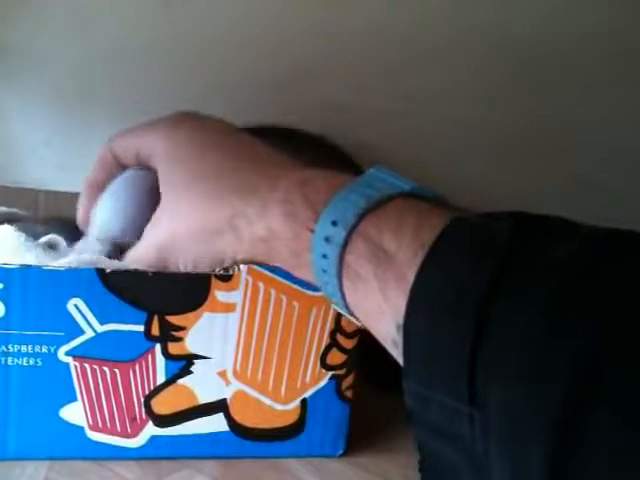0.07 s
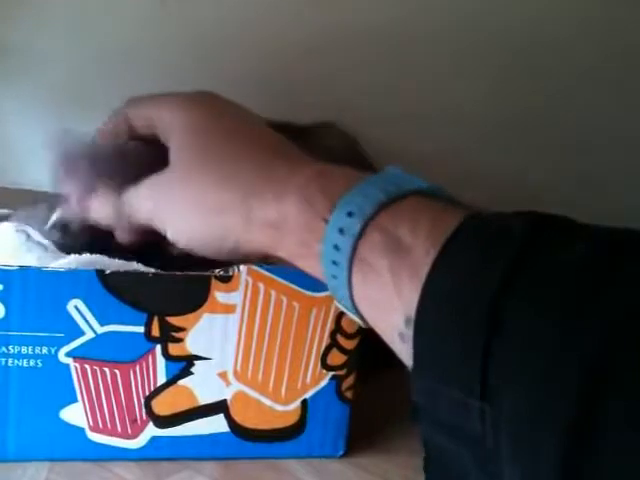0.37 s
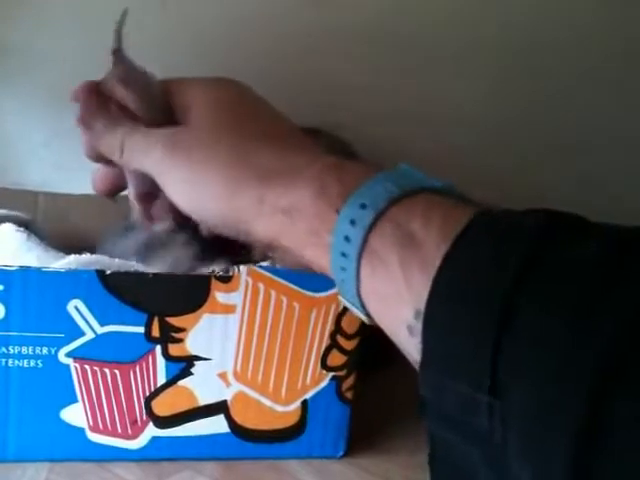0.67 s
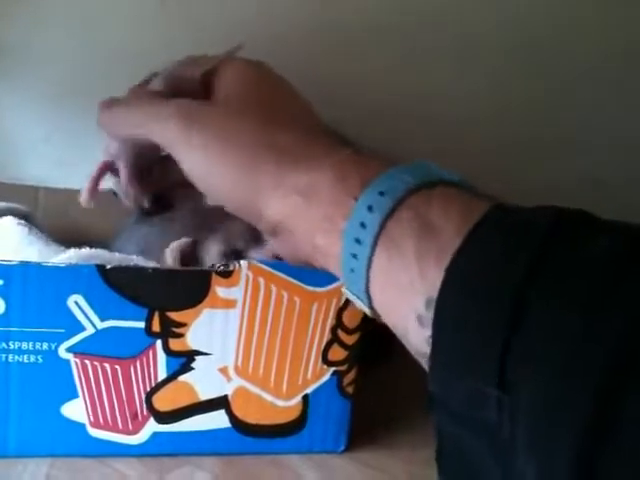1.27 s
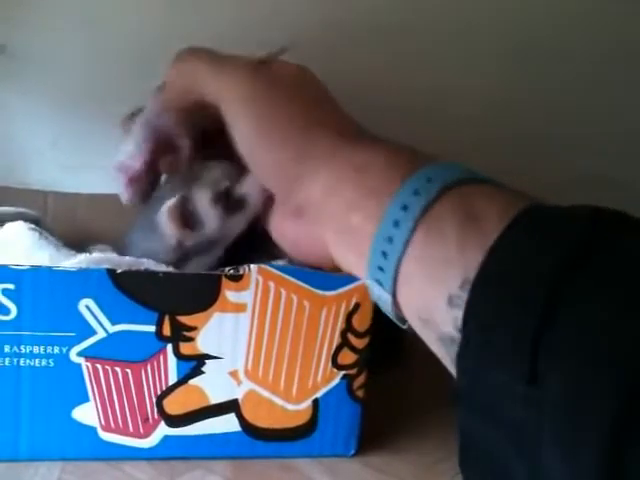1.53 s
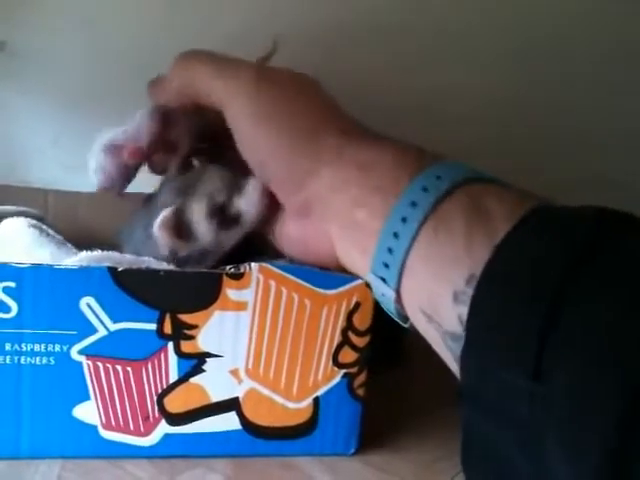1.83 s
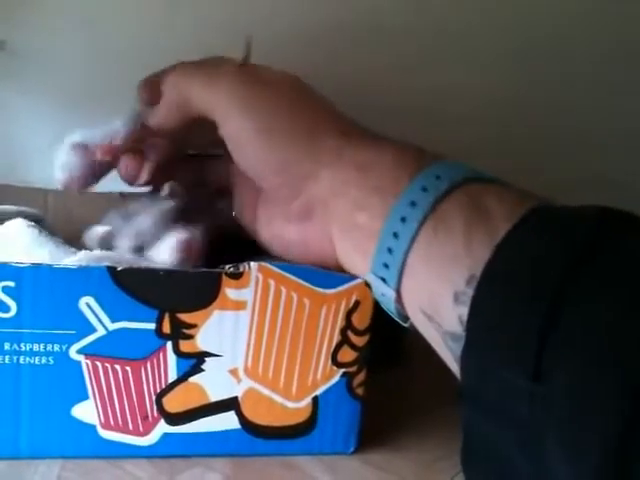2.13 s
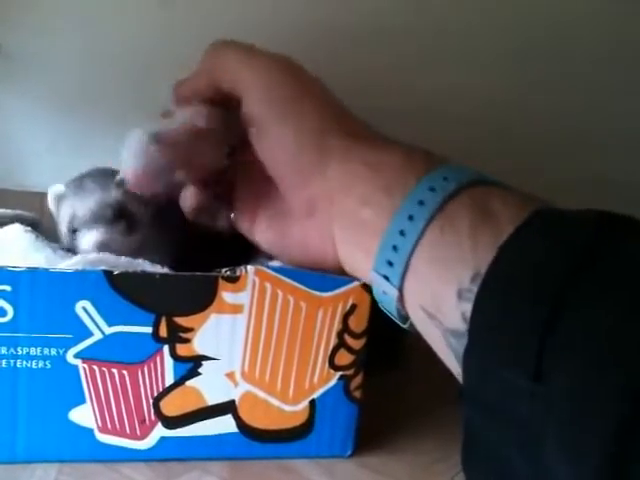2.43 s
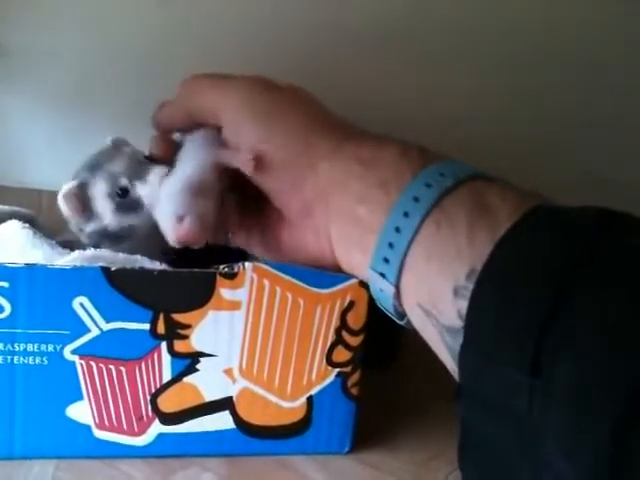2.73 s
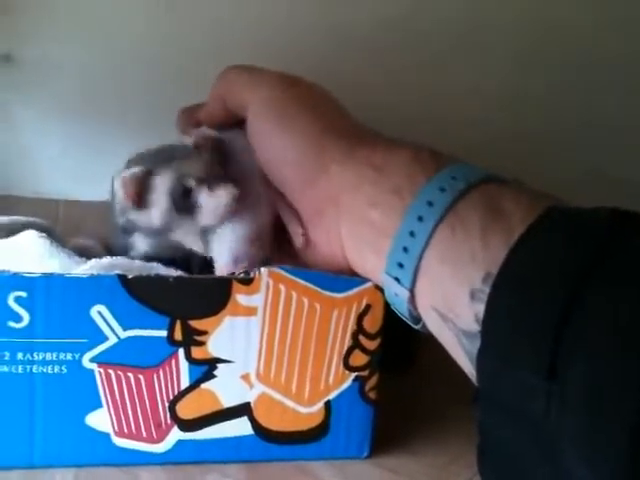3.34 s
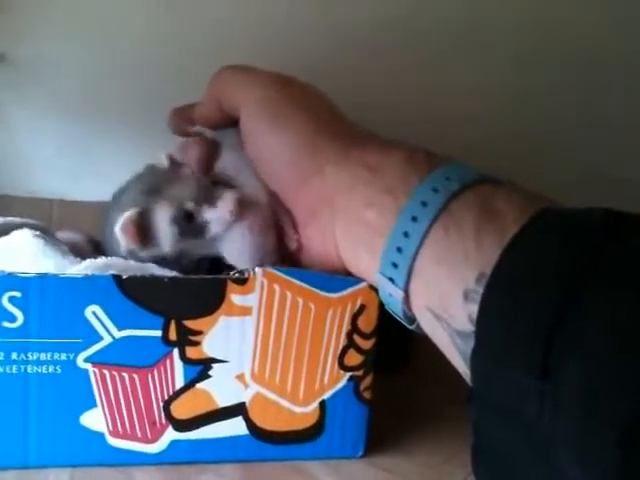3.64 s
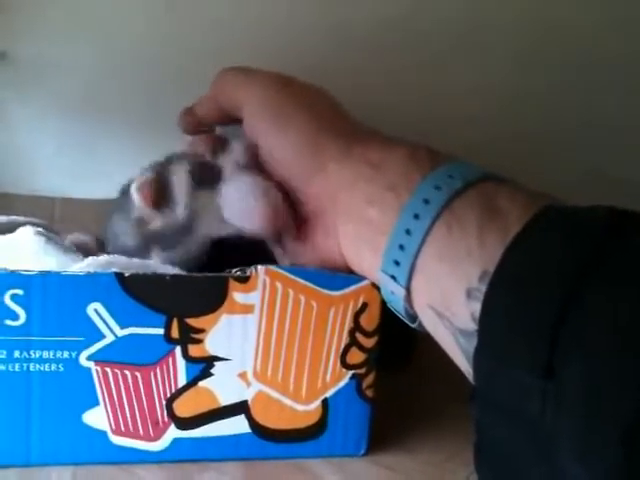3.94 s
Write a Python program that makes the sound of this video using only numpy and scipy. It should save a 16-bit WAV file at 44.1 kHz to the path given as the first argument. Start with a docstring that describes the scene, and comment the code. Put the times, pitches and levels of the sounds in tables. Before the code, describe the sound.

A baby ferret squeals shrilly again and again while its litter mates whimper faintly.

```python
"""A baby ferret, held in a hand, squeals in shrill arching cries that turn hoarse as the pitch sags.
Each cry is a stack of harmonics (multiples of one pitch) shaped by the throat and the moving mouth.
Its litter mates whimper behind it in a cardboard box and the mother clucks softly, while the hand
bumps the box and rustles the bedding. All of it is close to one microphone in a small room."""
import sys
import numpy as np
from scipy import signal
from scipy.fft import rfft, irfft
from scipy.io import wavfile
from scipy.ndimage import uniform_filter1d

SR = 44100
rng = np.random.default_rng(int(sys.argv[2]) if len(sys.argv) > 2 else 0)


def wav_record(signal):
    """Record a signal, one row per channel, as 16-bit PCM in the file named by sys.argv[1]."""
    frames = np.transpose(np.atleast_2d(signal))
    bounded = np.clip(frames, -1, 1)
    # unit amplitude maps onto the largest positive 16-bit level
    quanta = np.round(bounded * 32767).astype(np.int16)
    wavfile.write(sys.argv[1], SR, quanta)


N = 176400
TIME = np.arange(N) / SR

# Tone colours of the room's hush, the bedding, brushes on cloth and box knocks: frequency_hz, gain_db
HUSH_COLOUR = [(25, -16), (70, -13), (115, -16), (170, -9), (300, -0.5), (600, 0), (1000, -11), (2000, -9),
               (4000, -4), (7000, -15), (11000, -17.5), (15500, -37)]
BEDDING_COLOUR = [(60, -16), (120, 10), (300, 4), (900, 10), (2000, 13), (6000, -28), (14000, -70)]
BRUSH_COLOUR = [(300, -10), (1200, -4.5), (3000, 0), (6000, -4), (10000, -12), (15000, -19)]
BUMP_COLOUR = [(50, -24), (110, 7.5), (200, 9), (400, 1.5), (700, 3.5), (1500, -26), (6000, -40)]
# Echoes off the box and the wall: delay_s, gain_db
ECHOES = [(.0023, -19.5), (.0052, -21.5), (.0087, -9)]
# Fur and hand brushing the cloth: middle_s, half_length_s, level_db
BRUSHES = [(0.113, 0.1, -57.5), (0.324, 0.097, -52.5), (.98, 0.062, -50), (1.509, 0.045, -53.5),
           (1.774, 0.079, -56), (3.303, 0.043, -48)]
# Bumps on the box: start_s, level_db
BUMPS = [(2.355, -45.5), (2.59, -54), (3.18, -43.5)]
# The mother's clucks: start_s, relative_level_db
CLUCKS = [(0.022, -41), (0.984, -43.5), (1.101, -51.5), (1.21, -63), (1.294, -49), (1.43, -41.5),
          (1.56, -45), (1.668, -47), (1.774, -48), (2.99, -49), (3.439, -49), (3.58, -45.5), (3.678, -50.5),
          (3.812, -51.5), (3.913, -50)]
# Tone colours of the mother's cluck and of a baby's throat: frequency_hz, gain_db
CLUCK_COLOUR = [(100, -31), (170, 12), (240, -2), (330, 12.5), (480, 1), (700, -3.5), (1100, -19),
                (2500, -24)]
THROAT_COLOUR = [(700.0, -5.5), (1100.0, -2), (1600.0, -10), (2300.0, -3.5), (3200.0, -2.5), (4000.0, -3.5),
                 (4800.0, -6), (6000.0, -3.5), (7800.0, -6), (9800.0, -7), (12000.0, -14), (15500.0, -26)]
# Times when babies call from deep in the box: start_s, stop_s
LITTER_SPANS = [(0, 0.18), (0.302, 0.6), (.92, 1.62), (1.7, 3.87)]
# Whimpers of the nearer litter mates, one curve each: time_s, pitch_hz, relative_level_db, treble_db
WHIMPERS = [
    [(0.38, 936, -56, -25), (0.48, 947, -54.5, -25), (0.58, 883, -66, -25)],
    [(0.735, 917, -51, -23), (0.771, 1055, -52, -13), (0.88, 940, -51, -30)],
    [(2.6, 1006, -53, -12), (2.646, 1070, -51, -19), (2.76, 901, -57, -25)],
    [(3.05, 962, -53, -25), (3.328, 1112, -58.5, -20), (3.45, 970, -57, -25)],
    [(1.3, 1594, -54, -25), (1.444, 2024, -51, -25), (1.64, 1487, -53, -23)],
    [(2.85, 2020, -49, -25), (2.922, 1888, -44, -17), (3.01, 1990, -47, -25)],
    [(0.69, 2589, -44, -3), (0.728, 2110, -69, 16.5), (0.91, 2517, -57.5, -4.5)],
    [(0.0, 1032, -53, -11), (0.058, 965, -51.5, -10), (0.11, 757, -59, -18)],
    [(2.43, 953, -53.5, -15), (2.554, 1214, -51.5, -14), (2.6, 1123, -52, -11)],
]
# Cries of the held baby, one curve each: time_s, pitch_hz, relative_level_db, treble_db
CRY_1 = [(0.0, 1990, -43, -4), (0.03, 2090, -47, -2.5), (0.07, 2180, -42, -9.5), (0.1, 1950, -47, -24),
         (0.125, 1470, -49, -23), (0.175, 1590, -51, -24), (0.2, 1514, -52, -2), (0.22, 1710, -56, -7)]
CRY_2 = [(0.353, 1535, -46.5, 8), (0.37, 1656, -48.5, 8), (0.4, 1635, -45.5, 12),
         (0.435, 1636, -49.5, 11.5), (0.47, 1820, -47, 14), (0.5, 1877, -40.5, 3), (0.54, 1930, -43, 7),
         (0.58, 1793, -41, 2.5), (0.61, 1821, -36, -4.5), (0.67, 1704, -41.5, -5.5),
         (0.69, 1480, -42.5, -9), (0.71, 1169, -40, -29), (0.735, 980, -44, -14)]
CRY_3 = [(1.02, 1047, -44, -13), (1.05, 1182, -55.5, -2.5), (1.09, 1467, -38.5, -10),
         (1.13, 1702, -54.5, 12.5), (1.165, 1660, -50.5, 14.5), (1.205, 1679, -46.5, 10.5),
         (1.24, 1546, -38.5, 2.5), (1.26, 1629, -42, 6), (1.31, 1537, -37, -7), (1.375, 1566, -41.5, -5),
         (1.42, 1747, -41.5, -1), (1.45, 1420, -40, -4.5), (1.48, 1156, -42.5, -29),
         (1.525, 916, -50.5, -3)]
CRY_4 = [(1.775, 1159, -48, -13), (1.8, 1222, -55.5, 1.5), (1.85, 1215, -52.5, 4.5), (1.89, 1391, -50, 7.5),
         (1.92, 1302, -50.5, 3.5), (1.945, 1247, -50.5, 8), (1.97, 1570, -48, 8), (2.01, 1654, -42.5, 2.5),
         (2.04, 1526, -44, -3), (2.07, 1472, -45.5, 2), (2.1, 1698, -41, 2), (2.125, 1787, -33, -4.5),
         (2.16, 1628, -50, 7.5), (2.19, 1574, -45, -2), (2.22, 1231, -47.5, 3.5), (2.255, 1008, -53.5, 1.5),
         (2.28, 887, -43, -24)]
CRY_5 = [(2.29, 893.0, -51, -18), (2.34, 1082.0, -48, -19), (2.38, 1255.0, -47, -14),
         (2.4, 1477.0, -46.5, -10), (2.45, 1520.0, -41.5, -18.5), (2.48, 1152.0, -42.5, -24),
         (2.52, 912.0, -42, -21)]
CRY_6 = [(2.61, 1293, -57.5, 6.5), (2.65, 1377, -40.5, -7.5), (2.68, 1500, -53.5, 14),
         (2.72, 1558, -46, 2.5), (2.75, 1654, -40.5, 0), (2.787, 1953, -47, 19), (2.825, 1863, -43.5, 16.5),
         (2.85, 1934, -49, 20.5), (2.88, 2103, -41, 13), (2.915, 1977, -54.5, 25),
         (2.985, 2043, -43.5, 15.5), (3.02, 1965, -40, 8.5), (3.05, 2000, -44.5, 11),
         (3.08, 1921, -37.5, 4.5), (3.16, 1903, -41.5, 5), (3.19, 1818, -38, -1), (3.22, 1481, -40.5, -4.5),
         (3.27, 1155, -47, -3), (3.3, 989, -48, -7)]
CRY_7 = [(3.33, 1070, -55.5, -20), (3.38, 1337, -57.5, 7), (3.41, 1753, -54, 3), (3.445, 1740.0, -54, 1.5),
         (3.47, 1514, -50, 0), (3.505, 1653.0, -55, 1), (3.53, 1523, -40.5, -12), (3.56, 1249, -45, -8.5),
         (3.59, 1036.0, -49, -18), (3.68, 1065, -47.5, -24.5), (3.8, 878, -49.5, -12.5)]
CRY_8 = [(3.65, 1046, -54, -8), (3.7, 1608, -42, -19), (3.74, 1590, -37, -34), (3.78, 1674, -38, -40),
         (3.81, 1634, -36, -24.5), (3.84, 1800, -51, 7.5), (3.875, 2040, -37.5, 0.5),
         (3.925, 1935, -52.5, 18.5), (3.965, 1994, -40, 13), (4.0, 1842, -45.5, 20.5)]
# The voice in each cry: curve, hoarseness (0 to 1), highest_treble_db
CRIES = [(CRY_1, 0.077, 0), (CRY_2, 0.093, 1.7), (CRY_3, 0.077, -10.5), (CRY_4, 0.14, 0),
         (CRY_5, 0.033, -4), (CRY_6, 0.11, 0.62), (CRY_7, 0.23, 2.6), (CRY_8, 0.069, -7.5)]
# Where the held baby's mouth rings as it opens and closes: time_s, frequency_hz
MOUTH_RING = [(0.02, 8160), (0.08, 6000), (0.2, 3550), (0.35, 8000), (0.41, 7400), (0.46, 5840),
              (0.5, 5330), (0.55, 4000), (0.6, 5510), (0.66, 5300), (0.72, 5100), (1.05, 7000),
              (1.12, 8800), (1.19, 8670), (1.24, 6700), (1.3, 6370), (1.37, 3860), (1.45, 4000),
              (1.8, 8700), (1.9, 8500), (2.0, 5840), (2.06, 5900), (2.12, 9450), (2.17, 7120), (2.26, 6280),
              (2.65, 6850), (2.72, 5840), (2.76, 7400), (2.8, 8600), (2.84, 8650), (2.89, 6560),
              (3.0, 5650), (3.1, 5720), (3.26, 5240), (3.42, 3680), (3.55, 3600), (3.82, 6700),
              (3.88, 9200), (3.94, 8600), (4.0, 7900)]
# Boost or cut around that ringing frequency: frequency_multiple, gain_db
MOUTH_SHAPE = [(.5, -1.5), (.72, 0), (1, 4.5), (1.32, -2.5), (1.7, 0.5), (2.2, -4)]
# Moments when the voice cracks: time_s, added_hoarseness (0 to 1)
CRACKS = [(.45, .25), (2.769, 0.41), (2.862, 0.22), (3.2, 0)]

TREBLE_HZ, HIGHEST_TREBLE_HZ = (2550, 6880), (9150, 11400)  # where each band begins and is fully on
TOP_HZ = 15700
CLEAN_HZ, SLACK_HZ, SLACK_HOARSENESS = 1800, 1220, 0.27  # slack vocal folds make low notes hoarse
JITTER, SHIMMER_DB = 0.027, 5  # shake of pitch and loudness at full hoarseness
RASP_DB, SPLIT_DB = 1.5, -7.5  # noise and in-between tones in the treble at full hoarseness
WAVER, FLUTTER_DB = 0.0025, 3  # wobble of the pitch and of each harmonic, even in a clean voice


def undb(db):
    """Turn decibels into a number to multiply by."""
    return 10 ** (np.asarray(db) / 20)


def unit(x):
    """Scale a sound to an average strength (rms) of 1."""
    return x / np.sqrt(np.mean(x ** 2) + 1e-20)


def response(hz, points):
    """Read the gain of a tone colour table at these frequencies."""
    table_hz, db = np.array(points, float).T
    return undb(np.interp(np.log(hz + 1), np.log(table_hz), db))


def colour(x, points):
    """Filter a sound with a tone colour table."""
    return irfft(rfft(x) * response(np.fft.rfftfreq(len(x), 1 / SR), points), len(x))


def noise(points):
    """Noise with this tone colour, as long as the scene."""
    return colour(rng.standard_normal(N), points)


def wander(t, rate_hz):
    """Random drift of size about 1, with a new value rate_hz times a second."""
    values = rng.standard_normal(size=8192)
    return np.sqrt(3 / 2) * np.interp((t - t[0]) * rate_hz, np.arange(len(values)), values)


def ramp(hz, low_hz, high_hz):
    """Rise from 0 at the low frequency to 1 at the high one."""
    return np.clip(np.log(hz / low_hz) / np.log(high_hz / low_hz), 0, 1)


def fade(t, length_s):
    """A soft start and stop."""
    return np.sin(np.pi / 2 * np.clip(np.minimum(t - t[0], t[-1] - t) / length_s, 0, 1)) ** 2


def add(out, t, x):
    """Mix the sound x into out at the times t."""
    i = np.round(t * SR).astype(int)
    inside = (i >= 0) & (i < N)
    out[i[inside]] += x[inside]


def room_hush():
    """The faint, steady noise of the room."""
    return undb(-60) * unit(noise(HUSH_COLOUR))


def room_echoes(x, tail_s=0.12, tail_db=-18):
    """Sound bounces off the box and the wall, then dies away in a short tail."""
    t = TIME[:SR // 2]
    tail = rng.standard_normal(len(t)) * undb(-60 * t / tail_s) * np.clip(t / 0.012, 0, 1)
    bounces = undb(tail_db) * tail / np.sqrt(np.sum(tail ** 2))
    bounces[0] = 1  # the direct sound
    for delay_s, db in ECHOES:
        bounces[int(delay_s * SR)] += undb(db)
    return signal.fftconvolve(x, bounces)[:N]


def box_bumps(attack_s=0.004, decay_s=0.025):
    """The hand knocks the cardboard: dull bursts of noise that die quickly."""
    loudness = np.zeros(N)
    for start_s, db in BUMPS:
        age = np.maximum(TIME - start_s, 0)
        loudness += undb(db) * np.minimum(age / attack_s, 1) * np.exp(-age / decay_s)
    return loudness * unit(noise(BUMP_COLOUR))


def bedding(rustle_db=-59.5, swell_db=3, grain_db=3):
    """The cloth rustles in soft swells, with brighter strokes where fur and hand brush it."""
    rustle = unit(noise(BEDDING_COLOUR) * undb(swell_db * wander(TIME, 18)))
    brush = unit(noise(BRUSH_COLOUR) * undb(grain_db * wander(TIME, 360)))
    strokes = sum(undb(db) * np.exp(-((TIME - at) / half_s) ** 2) for at, half_s, db in BRUSHES)
    return undb(rustle_db) * rustle + strokes * brush


def mother_clucks(pitch_hz=263, length_s=0.044, gain_db=-3.5):
    """The mother's voice makes short, low clucks, uneven in pitch and loudness."""
    out = np.zeros(N)
    t = np.arange(int(length_s * SR)) / SR
    for start_s, db in CLUCKS:
        shaky_hz = pitch_hz * (1 + 0.064 * wander(t, 106))
        phase = 2 * np.pi * np.cumsum(shaky_hz) / SR
        buzz = sum(np.cos(k * phase) for k in np.arange(1, 9))
        cluck = unit(colour(buzz * undb(2 * wander(t, 335)), CLUCK_COLOUR))
        add(out, start_s - 0.005 + t, cluck * fade(t, 0.0058) * undb(db + gain_db))
    return out


def mouth_db(t, hz):
    """How much the opening and closing mouth boosts or cuts a harmonic."""
    ring_hz = np.interp(t, *np.array(MOUTH_RING, float).T)
    return np.interp(hz / ring_hz, *np.array(MOUTH_SHAPE, float).T)


def extra_hoarseness(t, pitch_hz, crack_s=0.011):
    """The voice roughens when the vocal folds go slack at low pitch, and briefly when it cracks."""
    slack = SLACK_HOARSENESS * np.clip((CLEAN_HZ - pitch_hz) / (CLEAN_HZ - SLACK_HZ), 0, 1)
    cracks = sum(size * np.exp(-((t - at) / crack_s) ** 2) for at, size in CRACKS)
    return slack + cracks


def squeal(curve, hoarseness, highest_db=0, octave_db=0, held=False, harmonics=11, fade_s=0.013):
    """One baby's call, as times and sound: shaky vocal folds make harmonics that the throat shapes."""
    times, *columns = np.array(curve, float).T
    t = np.arange(int((times[0] - fade_s / 2) * SR), int((times[-1] + fade_s / 2) * SR)) / SR
    pitch_hz, level_db, treble_db = (
        uniform_filter1d(np.interp(t, times, column), size=500, mode="nearest") for column in columns)
    rough = np.clip(hoarseness + held * extra_hoarseness(t, pitch_hz), 0, 1)
    shaky_hz = pitch_hz * (1 + JITTER * rough * wander(t, 700) + WAVER * wander(t, 120))
    phase = 2 * np.pi * np.cumsum(shaky_hz) / SR
    voice = np.zeros(len(t))
    for k in range(1, harmonics + 1):
        hz = k * pitch_hz
        treble = ramp(hz, *TREBLE_HZ)
        shape_db = treble_db * treble + highest_db * ramp(hz, *HIGHEST_TREBLE_HZ)
        shape_db += octave_db * np.log2(k) + held * mouth_db(t, hz)
        flutter_db = FLUTTER_DB * wander(t, 110)
        gain = response(hz, THROAT_COLOUR) * undb(shape_db + flutter_db) * (hz < TOP_HZ)
        angle = k * phase + 2 * np.pi * rng.random()
        # The rasp is a narrow band of noise that clings to the harmonic.
        rasp = wander(t, 450) * np.sin(angle) + wander(t, 450) * np.cos(angle)
        voice += gain * (np.sin(angle) + undb(RASP_DB) * rough * treble * rasp)
        # Weak tones sit halfway between the low harmonics; hoarseness adds them in the treble too.
        between_hz = (k - 0.5) * pitch_hz
        low_gain = undb(-22) * response(between_hz, THROAT_COLOUR) / (1 + (between_hz / 2190) ** 4)
        split_gain = undb(SPLIT_DB) * rough * treble * gain
        voice += (low_gain + split_gain) * np.sin(angle - phase / 2)
    loudness = undb(level_db + SHIMMER_DB * rough * wander(t, 300))
    return t, np.sqrt(2) * voice * loudness * fade(t, fade_s)


def faint_litter(calls_per_s=6, typical_s=0.28):
    """Muffled whimpers come from deep in the box at random times, each rising and falling in pitch."""
    out = np.zeros(N)
    progress = np.linspace(0, 1, num=7)
    arch = np.sin(np.pi * progress)
    level_db, treble_db = -57 + 4 * arch, -13 + 3 * arch
    for start_s, stop_s in LITTER_SPANS:
        span_s = stop_s - start_s
        calls = int(np.ceil(span_s * calls_per_s))
        for i, (delay, size, height) in enumerate(rng.random((calls, 3))):
            length_s = min(typical_s * (0.5 + size), span_s)
            call_s = start_s + (i + delay) / calls * (span_s - length_s)
            pitch_hz = 690 * (0.75 + 0.5 * height) * (1 + 0.6 * arch)
            curve = np.c_[call_s + length_s * progress, pitch_hz, level_db, treble_db]
            add(out, *squeal(curve, hoarseness=0.04, octave_db=-8, harmonics=5))
    return out


def litter_mates(gain_db=4.5):
    """The nearer babies whimper; the bedding muffles them a little more with each octave."""
    out = np.zeros(N)
    for curve in WHIMPERS:
        add(out, *squeal(curve, hoarseness=0.085, highest_db=10, octave_db=-2))
    return out * undb(gain_db)


def held_baby():
    """The baby in the hand cries shrilly, with a moving mouth and a voice that cracks."""
    out = np.zeros(N)
    for curve, hoarseness, highest_db in CRIES:
        add(out, *squeal(curve, hoarseness, highest_db, held=True))
    return out


def scene():
    """All the sounds in the room, the same in both channels."""
    hush = room_hush()
    ferrets = held_baby() + litter_mates() + faint_litter() + mother_clucks()
    mono = room_echoes(ferrets + box_bumps() + bedding()) + hush
    return np.array([mono, mono])


def record(dry, low_cut_hz=25):
    """The small microphone thins the deepest bass and the recorder cuts the very top."""
    thinned = signal.sosfilt(signal.butter(1, low_cut_hz, "high", fs=SR, output="sos"), dry)
    return signal.sosfilt(signal.ellip(10, 0.2, 80, TOP_HZ, fs=SR, output="sos"), thinned)


dry = scene()
out = record(dry)
wav_record(out)
```